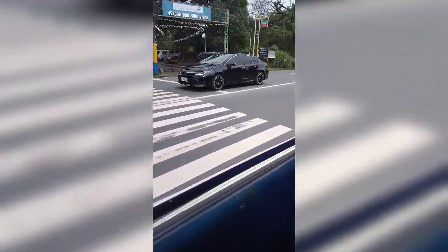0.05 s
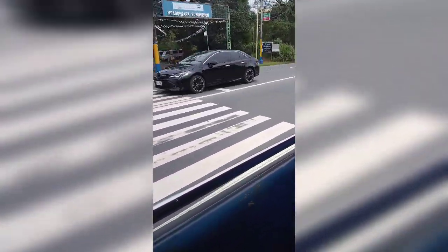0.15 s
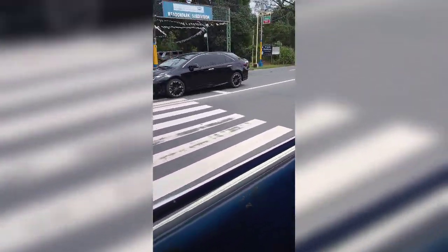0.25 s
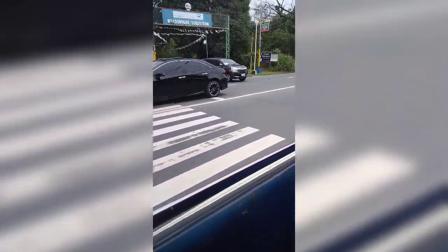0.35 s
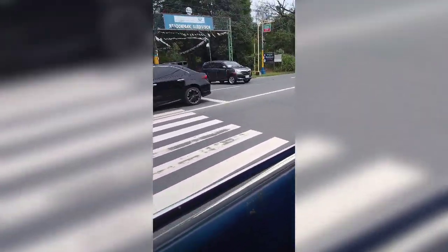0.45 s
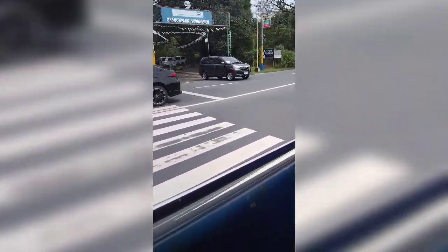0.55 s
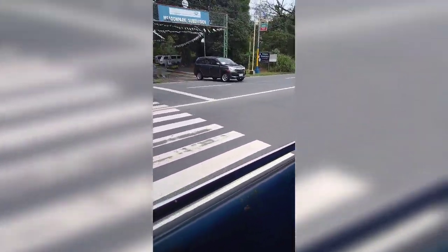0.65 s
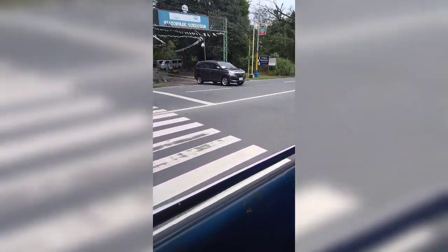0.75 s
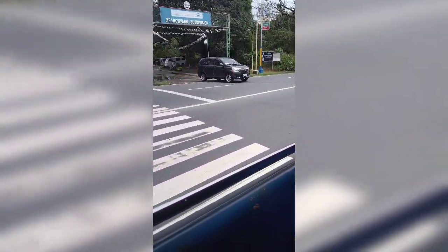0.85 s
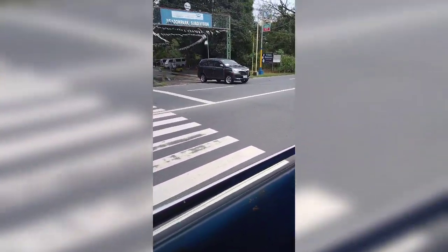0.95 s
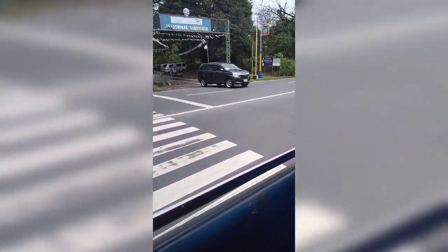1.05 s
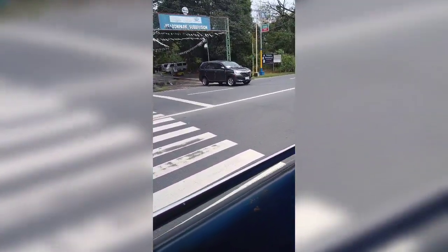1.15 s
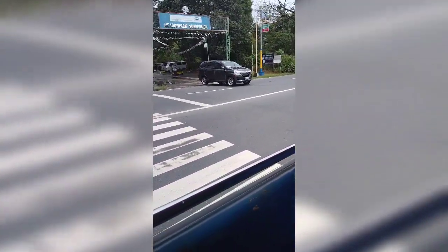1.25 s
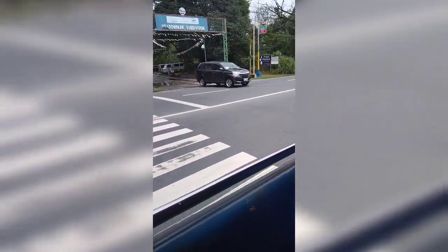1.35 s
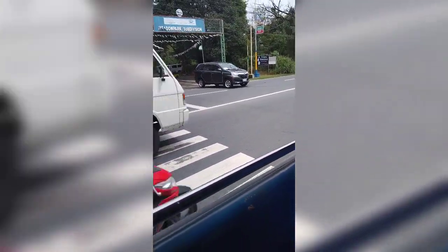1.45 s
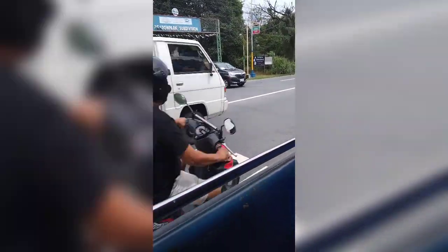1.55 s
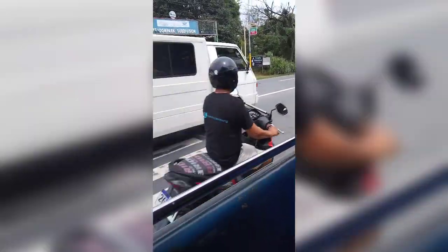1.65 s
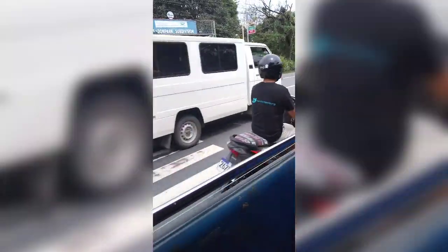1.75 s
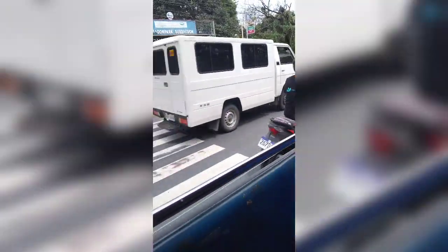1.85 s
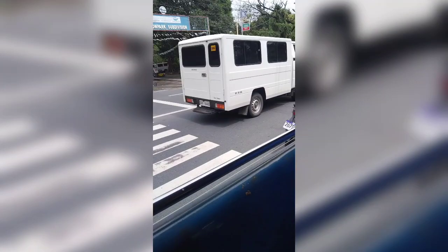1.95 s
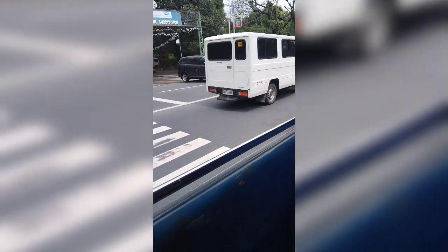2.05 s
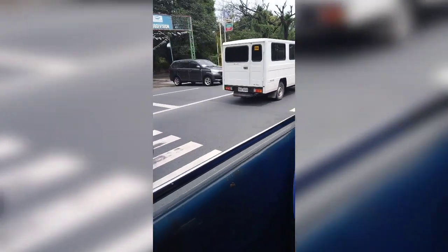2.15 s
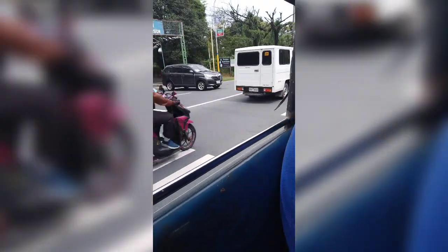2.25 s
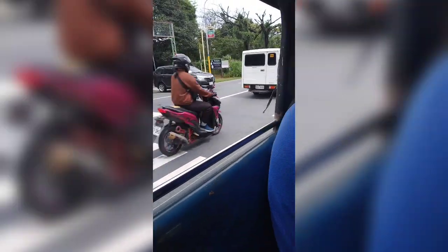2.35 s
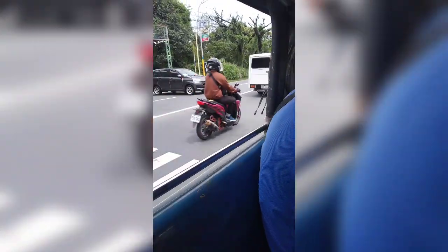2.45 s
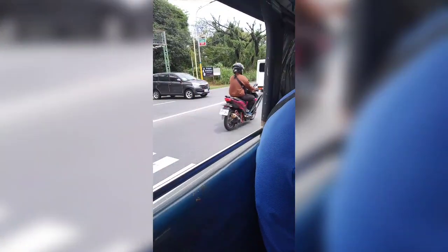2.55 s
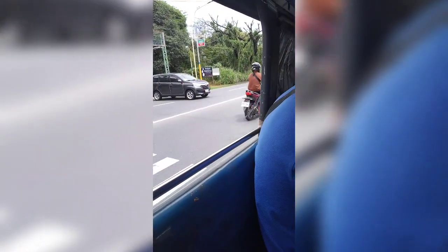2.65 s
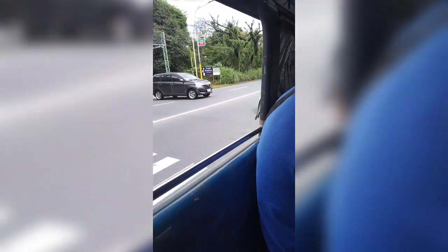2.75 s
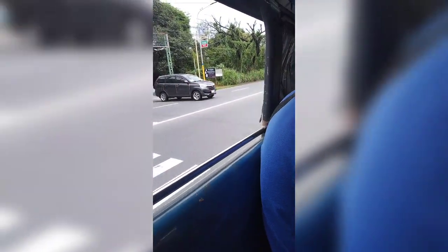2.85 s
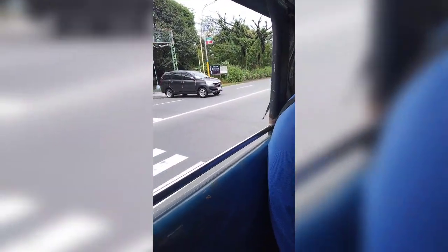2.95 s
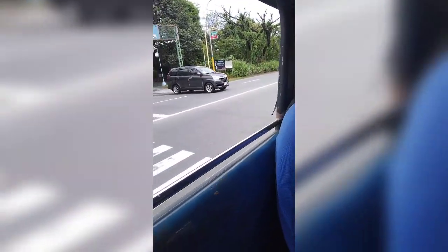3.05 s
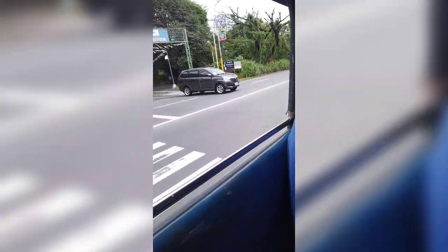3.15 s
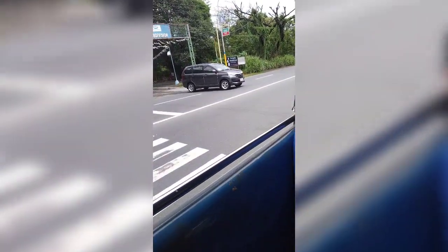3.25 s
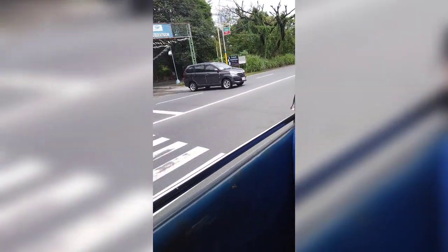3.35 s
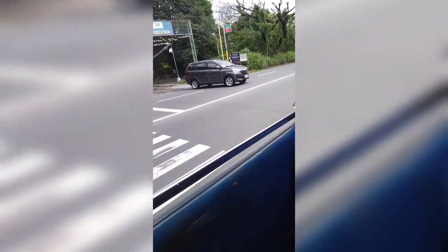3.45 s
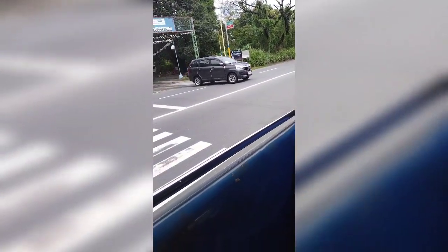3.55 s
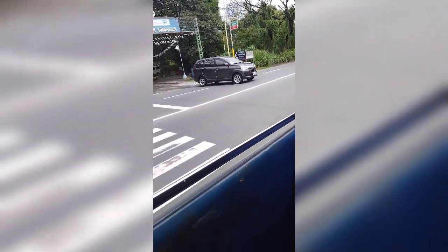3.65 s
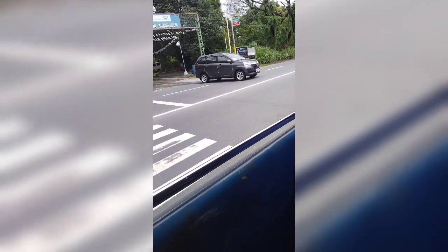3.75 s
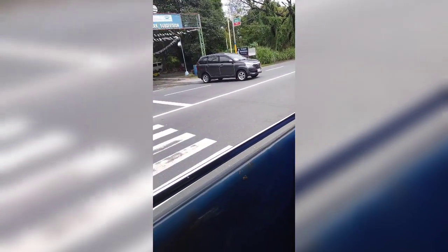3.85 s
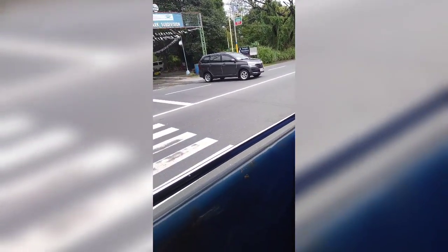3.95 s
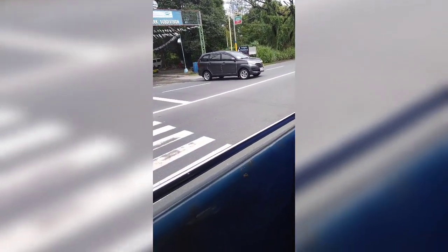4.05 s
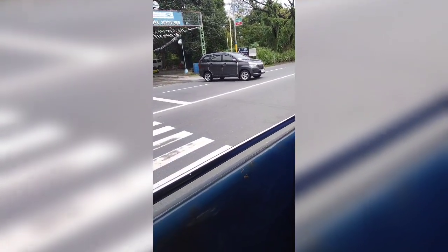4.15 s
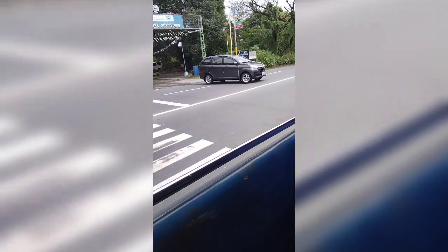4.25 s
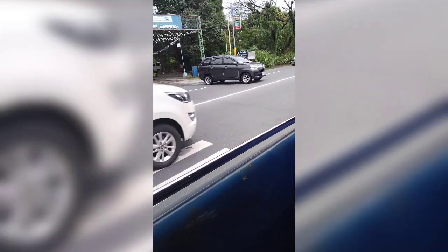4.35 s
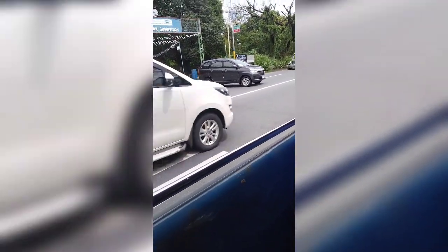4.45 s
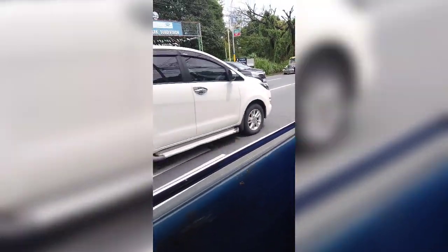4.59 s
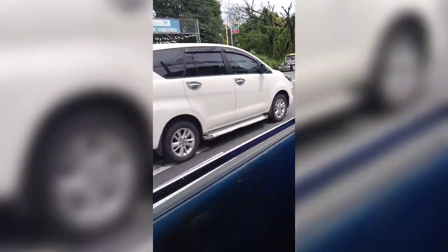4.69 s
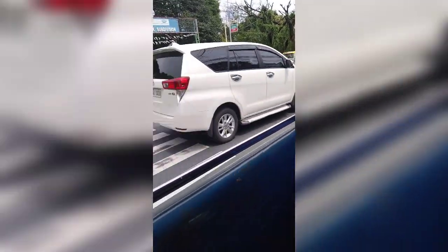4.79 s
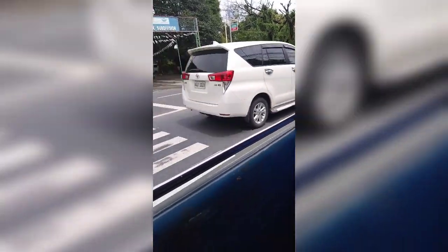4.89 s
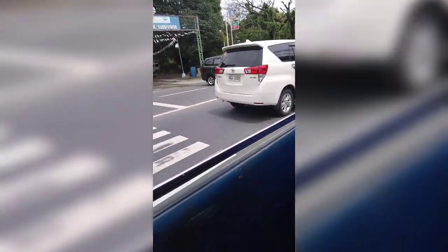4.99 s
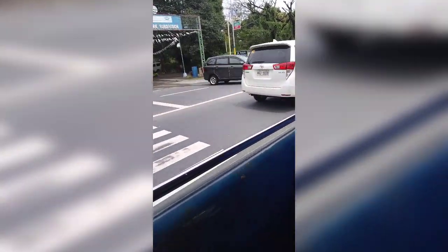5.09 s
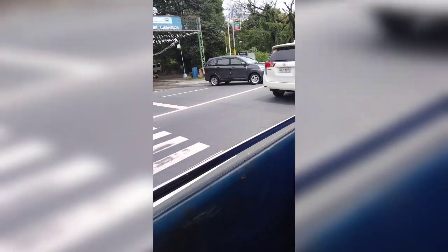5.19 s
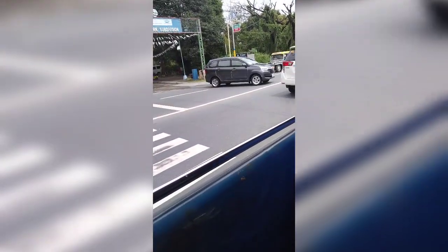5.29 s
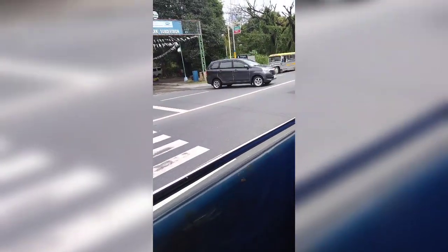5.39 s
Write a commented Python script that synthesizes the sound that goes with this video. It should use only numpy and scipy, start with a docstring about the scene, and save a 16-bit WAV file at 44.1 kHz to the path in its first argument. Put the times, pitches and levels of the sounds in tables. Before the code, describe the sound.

Low cabin rumble runs under street traffic, heard through the open window of a creeping vehicle. After some faint metallic clicks, a van passes close by along with a brief motorcycle boom, then a scooter drones past and fades. Dull blows thud on the vehicle's body, the hardest with a small rattle. Finally a diesel car swishes by and surges briefly as it pulls away.

```python
"""Cabin rumble and distant traffic, heard at the open side window of a creeping vehicle.
A van passes with a motorcycle's short exhaust boom; a droning scooter follows, then a diesel car.
Each pass is tyre roar and engine hiss, pulsed by the firings, coloured by road reflection and cabin.
A loose fitting rattles; dull blows ring the body panels, the hardest just after 4 s."""
import sys
import numpy as np
from scipy import signal
from scipy.fft import rfft, irfft
from scipy.io import wavfile
from scipy.ndimage import uniform_filter1d

SR = 44100
rng = np.random.default_rng(int(sys.argv[2]) if len(sys.argv) > 2 else 0)


def dump(signal):
    """Clip the signal to [-1, 1] and save it as 16-bit WAV at the path in sys.argv[1]."""
    limited = np.clip(np.atleast_2d(signal).T, -1, 1)
    pcm = np.round(limited * 32767).astype(np.int16)
    wavfile.write(sys.argv[1], SR, pcm)


N = 239154
TIME_S = np.arange(N) / SR
STFT = dict(fs=SR, nperseg=1024, noverlap=768)
BINS_HZ, FRAMES_S, _ = signal.stft(np.zeros(N), **STFT)
BINS_HZ = np.maximum(BINS_HZ, 1)[:, None]

# spectra of cabin rumble, faint hiss and loose fitting (frequency [Hz], gain [dB])
RUMBLE_SPECTRUM = [(15, -64), (25, -19), (38, -27), (58, -6.5), (113, -2.5), (140, -5.5), (167, -5.5),
                   (270, -18), (417, -14.5), (503, -21), (549, -18), (800, -24), (1040, -3), (1760, -120)]
AIR_SPECTRUM = [(4000, -12), (7500, -12), (9500, 1.5), (12500, -2), (15500, -0.5)]
RATTLE_SPECTRUM = [(1800, -2), (2500, 2), (3100, -7.5), (3550, 1), (3900, -13), (4500, -5), (5300, -13),
                   (7600, -11), (9700, -20), (15500, -27)]
# runs of chatter (start [s], level [dB], length [s], low cut [Hz])
RATTLE_RUNS = [(0.515, -46.5, 0.043, 3460), (0.716, -37, 0.011, 2600), (0.751, -36.5, 0.026, 2780),
               (4.056, -38, 0.019, 3270), (4.79, -42, 0.036, 1520)]
# body panel modes (frequency [Hz], gain [dB], free T60 [s])
BODY_MODES = [(127.3, -3, 0.15), (161, -6.5, 0.11), (180.4, -14.5, 0.35), (231.7, -19.5, 0.5),
              (301, -18, 0.46), (353, 3, 0.038), (383, -16.5, 0.36), (424, -22.5, 0.51), (533, -33, 0.6),
              (562, -5.5, 0.11), (608, -20, 0.29), (1302, 1.5, 0.16)]
# blows on the body (time [s], gain [dB], low cut [Hz], high cut [Hz], ring [0-1])
BLOWS = [(3.445, 1, 74.5, 131, 0.1), (3.943, 3, 82, 146, 0.4), (4.052, 10, 274, 400, 0.63),
         (4.062, 3.5, 274, 860, 0.45), (4.070, 12.5, 102, 507, 1)]
# hollow tones in the street noise (time [s], frequency [Hz], level [dB], length [s])
STREET_TONES = [(1.432, 690, -44, 0.027), (1.522, 421, -38.5, 0.039), (1.702, 372, -40.5, 0.031),
                (3.103, 1352, -43, 0.013), (3.171, 610, -48, 0.041), (5.233, 1590, -32, 0.0047)]
# exhaust resonances (frequency [Hz], width [Hz], gain [dB])
SCOOTER_PIPE_MODES = [(223, 48, -7), (313, 37, -6.5), (397.5, 66, -6.5)]
CAR_PIPE_MODES = [(190, 51, 0), (340, 65, 6)]
# scooter exhaust envelope (time [s], gain [dB])
SCOOTER_ENVELOPE = [(2.04, -42.5), (2.074, -61), (2.164, -31.5), (2.234, -33.5), (2.344, -26.5),
                    (2.454, -36), (2.504, -33), (2.65, -33.5), (2.9, -62.5)]
# motorcycle exhaust note (time [s], frequency [Hz])
BOOM_NOTE = [(1.55, 132.3), (1.61, 125.9), (1.66, 119), (1.71, 114.2), (1.79, 128.8), (1.92, 113)]
# engine hiss spectra (frequency [Hz], gain [dB])
FAR_SPECTRUM = [(2200, 0), (2450, 16), (2620, -59), (3400, -8), (5500, -69), (7000, -17), (8000, -4),
                (9500, -63), (15500, -51)]
VAN_SPECTRUM = [(2000, -0.5), (2700, -10.5), (3340, -6), (4360, -15.5), (5540, -11.5), (7680, -15.5),
                (9000, -22), (15500, -24.5)]
SCOOTER_SPECTRUM = [(2000, 5), (2440, 4), (2850, -4.5), (3320, -1.5), (4000, -8.5), (6250, -11),
                    (7600, -11.5), (9000, -17), (12000, -24.5), (15500, -20)]
CAR_SPECTRUM = [(2000, -14), (2250, 6.5), (2900, 5), (3290, -2), (3580, 2.5), (4000, -12), (4450, -6.5),
                (5850, -2.5), (6500, -13), (8700, -19), (15500, -21.5)]
# cabin modes in the roar (frequency [Hz], base width [Hz], far [dB], van [dB], scooter [dB], car [dB])
ROAR_MODES = [(567, 33, 3, 28, 6.5, -12), (942, 69, 6.5, 6.5, 1, 4.5), (1328, 75, 10.5, -4.5, 1, -2.5),
              (1572, 120, -51, -0.5, -10, -0.5), (1702.5, 61, -1, 2, -4.5, -10.5),
              (1955, 25, -8, 1.5, 0, -7)]
# peaks and dips in quiet hiss (frequency [Hz], width [Hz], base gain [dB])
HISS_PEAKS = [(2278, 12, -2), (2998, 133, 7), (3740, 36, 30), (4310, 490, 16), (6940, 32, -13),
              (8020, 3600, 8.5), (13900, 480, 9)]
# passes; the car surges again as it pulls away
# (vehicle, abreast [s], hold [s], hiss [dB], base rise [dB/s], base fall [dB/s],
#  roar [dB], rise [dB/s], fall [dB/s], roar low cut when near [Hz])
PASS_BYS = [("far", 0.32, 0.48, -61, 140, 10.4, -55.5, 10, 2.2, 1570),
            ("van", 1.447, 0.21, -40, 17.2, 83, -36, 42.5, 70, 1050),
            ("scooter", 2.32, 0.33, -35, 15.2, 19.6, -31.5, 90, 34, 630),
            ("far", 3.234, 0.6, -60.5, 25, 25, -53, 28, 100, 310),
            ("car", 4.684, 0.34, -42, 20, 14, -41.5, 34, 6.8, 760),
            ("car", 5.325, 0.15, -45.5, 170, 60, -37.5, 880, 87, 1400)]


def undb(db):
    """Decibels to gain."""
    return 10 ** (np.asarray(db) / 20)


def unit(x):
    """Scale to RMS 1."""
    return x / np.sqrt(np.mean(x ** 2))


def curve(points):
    """Linear interpolation of (time, value) points at every sample."""
    return np.interp(TIME_S, *np.transpose(points))


def gate(start_s, end_s, fade_s=0.025):
    """Gain 1 between two times, soft edges."""
    return np.sqrt(np.clip(np.minimum(TIME_S - start_s, end_s - TIME_S) / fade_s + .5, 0, 1))


def swell(at_s, start_s, end_s, rise_db_per_s, fall_db_per_s, steepen_per_s=0):
    """Gain that rises until start_s, holds, and falls after end_s."""
    early_s, late_s = np.maximum(start_s - at_s, 0), np.maximum(at_s - end_s, 0)
    drop_db = rise_db_per_s * early_s + fall_db_per_s * late_s
    return undb(-drop_db * (1 + steepen_per_s * (early_s + late_s)))


def colour(spectrum, hz):
    """Gain of a spectrum, interpolated on log frequency."""
    points_hz, db = np.transpose(spectrum)
    return undb(np.interp(np.log(np.maximum(hz, 1)), np.log(points_hz), db))


def bell(x, centre, width):
    """Resonance curve, peak 1."""
    return 1 / (1 + ((x - centre) / (.5 * width)) ** 2)


def filtered(x, gain):
    """Filter by a function of frequency."""
    return irfft(rfft(x) * gain(np.fft.rfftfreq(N, 1 / SR)), N)


def butter(x, hz, kind, order=2):
    """Low-pass or high-pass."""
    return signal.sosfilt(signal.butter(order, hz, kind, fs=SR, output="sos"), x)


def noise():
    """White noise."""
    return rng.standard_normal(N)


def drift(bandwidth_hz):
    """Smooth random drift, RMS 1."""
    return unit(filtered(noise(), lambda f: np.exp(-(f / bandwidth_hz) ** 2)))


def shaped_noise(gain, low_hz, high_hz):
    """Noise with a time-varying spectrum; power held at 1 between low_hz and high_hz."""
    band = (BINS_HZ > low_hz) & (BINS_HZ < high_hz)
    gain = gain / np.sqrt(np.mean(gain ** 2 * band, axis=0))
    spectra = signal.stft(noise(), **STFT)[2]
    return signal.istft(spectra * gain, **STFT)[1][:N]


def patches(frames):
    """Random field of narrow bands that come and go, RMS 1."""
    field = uniform_filter1d(rng.standard_normal((len(BINS_HZ), len(FRAMES_S))), size=3, axis=0)
    return unit(uniform_filter1d(uniform_filter1d(field, frames, axis=1), frames, axis=1))


def cabin(rumble_db=-51.5, air_db=-66.5):
    """Low rumble of the creeping vehicle, plus faint flickering hiss."""
    rumble = unit(filtered(noise(), lambda f: colour(RUMBLE_SPECTRUM, f) / (1 + (f / 750) ** 8)))
    flicker = undb(3 * patches(frames=16))
    rumble *= undb(rumble_db + 0.25 * drift(2.7))
    air = shaped_noise(colour(AIR_SPECTRUM, BINS_HZ) * flicker, 7000, 16000)
    return rumble + air * undb(air_db)


def rattles(chatter_t60_s=0.13, tail_db=-12, tail_t60_s=1.0):
    """A loose metal fitting chatters: bright noise bursts that build and die away."""
    out = np.zeros(N)
    for start_s, db, length_s, low_hz in RATTLE_RUNS:
        age_s = np.maximum(TIME_S - start_s, 0)
        rise = np.minimum(age_s / (.35 * length_s), 1)
        decay = undb(-60 * np.maximum(age_s - length_s, 0) / chatter_t60_s)
        tail = undb(tail_db - 60 * age_s / tail_t60_s)
        chatter = filtered(noise() * undb(0.31 * drift(370)), lambda f: colour(RATTLE_SPECTRUM, f))
        out += unit(butter(chatter, low_hz, "high", order=8)) * rise * np.maximum(decay, tail) * undb(db)
    return out


def knocks(gain_db=-24, tail_db=-13, tail_t60_s=.45, contact_s=0.0028, damped_t60_s=0.081):
    """Blows ring the body panels; soft ones reach only the lowest modes and die at once."""
    age_s = TIME_S[:SR // 2]
    panels = sum(undb(db - 60 * age_s / t60_s) * np.sin(2 * np.pi * hz * age_s)
                 for hz, db, t60_s in BODY_MODES)
    tail = unit(butter(butter(noise(), 567, "low", order=8), 87, "high"))[:len(age_s)]
    tail *= undb(tail_db - 60 * age_s / tail_t60_s)
    push = 1 - np.exp(-age_s / contact_s)  # padded contact
    out = np.zeros(N)
    for start_s, db, low_hz, high_hz, ring in BLOWS:
        damping = undb(-60 * age_s * max(1 - ring, 0) / damped_t60_s)
        blow = butter((panels + tail) * push * damping, high_hz, "low", order=4)
        blow = butter(blow, low_hz, "high", order=3)
        out += np.pad(blow * undb(db + gain_db), (int(start_s * SR), N))[:N]
    return out


def street_tones():
    """Brief hollow tones swell out of the street noise."""
    sway_rad = 0.64 * drift(80)
    out = np.zeros(N)
    for peak_s, hz, db, length_s in STREET_TONES:
        envelope = undb(db) * np.exp(-2 * ((TIME_S - peak_s) / length_s) ** 2)
        out += np.sqrt(2) * envelope * np.sin(2 * np.pi * hz * TIME_S + sway_rad)
    return out


def scooter_whine(level_db=-55, abreast_s=2.22, cross_s=0.32, speed_m_per_s=12):
    """Two thin drive tones sink by Doppler shift as the scooter passes."""
    along = (TIME_S - abreast_s) / cross_s  # in units of the closest distance
    distance = np.hypot(1, along)
    doppler = 1 - speed_m_per_s / 343 * along / distance
    tones = sum(np.sin(2 * np.pi * np.cumsum(hz * doppler) / SR) * drift(70) * undb(1.4 * drift(12))
                for hz in (10480, 14400))
    return tones * undb(level_db) / distance ** 2


def pipe_drone(modes, firing_hz, jitter, gas_db, harmonic, note_db):
    """Uneven firings and rushing gas ring an exhaust pipe; one harmonic stands out."""
    cycles = np.cumsum(firing_hz * (1 + jitter * drift(41.7))) / SR
    firings = unit(np.diff(np.floor(cycles), prepend=0) * undb(3.6 * drift(72)))
    flow = firings + undb(gas_db) * noise()
    rasp = unit(filtered(flow, lambda f: sum(undb(db) * bell(f, hz, width) for hz, width, db in modes)))
    note = unit(np.sin(2 * np.pi * harmonic * cycles) * undb(2.2 * drift(25)))
    return unit(rasp + undb(note_db) * note)


def exhausts(scooter_gain_db=0.5, car_gain_db=-38):
    """The scooter's pipe drones beside the window; the car's sounds briefly as it pulls away."""
    scooter = pipe_drone(SCOOTER_PIPE_MODES, firing_hz=44.6, jitter=.018,
                         gas_db=3, harmonic=6, note_db=-0.5)
    car = pipe_drone(CAR_PIPE_MODES, firing_hz=67.9, jitter=0.025, gas_db=6, harmonic=5, note_db=-4.0)
    scooter *= undb(curve(SCOOTER_ENVELOPE) + scooter_gain_db)
    scooter *= gate(SCOOTER_ENVELOPE[0][0], SCOOTER_ENVELOPE[-1][0])
    return scooter + car * swell(TIME_S, 5.392, 5.385, 131, 350) * undb(car_gain_db)


def motorcycle_boom(start_s=1.575, end_s=1.662, note_db=-17, octave_db=-31, beat_hz=9.9, beat_db=2.5):
    """The tailpipe faces the window and the cabin booms; the note beats and breaks up as it turns away."""
    phase = 2 * np.pi * np.cumsum(curve(BOOM_NOTE)) / SR
    turned = np.clip((TIME_S - end_s) / 0.07, 0, 1)
    beat = undb(beat_db * turned * np.cos(2 * np.pi * beat_hz * (TIME_S - 1.69)))
    envelope = undb(note_db) * swell(TIME_S, start_s, end_s, 865, 75, steepen_per_s=1.1)
    note = np.sqrt(2) * np.sin(phase + .7 * turned * drift(25))
    note *= undb((.5 + 2.2 * turned) * drift(30))
    octave = np.sqrt(2) * np.sin(2 * phase + 0.84 * drift(38))
    octave *= undb(octave_db) * swell(TIME_S, start_s, end_s, 500, 180)
    gas = unit(filtered(noise(), lambda f: bell(f, 182, 106) * f / (f + 60))) * undb(-19 + 6.2 * turned)
    buffet = unit(butter(noise(), 80, "low", order=4)) * undb(-27)  # gas pushes the cabin air
    return ((note + gas + buffet) * envelope + octave) * beat


def passing(name, far_cut_hz):
    """Per frame: hiss level, roar level, roar low cut, time since abreast."""
    hiss, roar, cut_hz, since_s = 1e-12, 1e-12, far_cut_hz, np.inf
    for (who, abreast_s, hold_s, hiss_db, hiss_rise, hiss_fall,
         roar_db, roar_rise, roar_fall, near_cut_hz) in PASS_BYS:
        if who == name:
            span_s = abreast_s - hold_s / 2, abreast_s + hold_s / 2
            # the window frame shades the hiss: it fades ever faster with distance
            shaded = swell(FRAMES_S, *span_s, hiss_rise, hiss_fall, steepen_per_s=0.65)
            hiss = np.hypot(hiss, undb(hiss_db) * shaded)
            roar = np.hypot(roar, undb(roar_db) * swell(FRAMES_S, *span_s, roar_rise, roar_fall))
            # the cut moves towards each pass's near value as it comes abreast
            facing = bell(FRAMES_S, abreast_s + 0.25 * hold_s, 0.88 * hold_s)
            cut_hz = cut_hz * (near_cut_hz / far_cut_hz) ** facing
            offset_s = FRAMES_S - abreast_s
            since_s = np.where(abs(offset_s) < abs(since_s), offset_s, since_s)
    return 20 * np.log10(hiss), 20 * np.log10(roar), cut_hz, since_s


def road_reflection(since_s, cross_s, near_crest_hz, crest_db, approach_db, lead_s):
    """Road bounce: a crest and a trough sink as the vehicle nears; one band cancels briefly."""
    distance = np.hypot(1, since_s / cross_s)  # 1 at the closest point
    crest_hz = near_crest_hz * np.minimum(distance, 2.5)
    ripple = bell(BINS_HZ, crest_hz, crest_hz / 10.5) - bell(BINS_HZ, 0.69 * crest_hz, 0.25 * crest_hz)
    depth_db = crest_db + approach_db * bell(since_s, -lead_s, 0.45)
    notch_db = -20 * bell(since_s, -0.57, 0.14) * bell(BINS_HZ, 4190, 810)
    return undb(depth_db * ripple + notch_db), crest_hz


def vehicle(name, spectrum, roar_column, firing_hz, clatter_db, peak_share, far_cut_hz, **reflection):
    """Tyre roar and engine hiss: broad when loud; when quiet, peaks stand out and narrow bands flicker."""
    hiss_db, roar_db, cut_hz, since_s = passing(name, far_cut_hz)
    quiet = np.clip((-29.5 - hiss_db) / 20, 0, 1.2)
    road, crest_hz = road_reflection(since_s, **reflection)

    widen = 1 + 1.8 * np.clip((roar_db + 46) / 10, 0, 1.3)  # direct sound fills the valleys
    roar_gain = np.sqrt(sum((undb(levels_db[roar_column]) * bell(BINS_HZ, hz, width_hz * widen)) ** 2
                            for hz, width_hz, *levels_db in ROAR_MODES))
    roar_gain /= np.sqrt(1 + (cut_hz / BINS_HZ) ** 14)
    roar_gain *= undb((1 + 5.8 * quiet) * patches(frames=7))

    hiss_cut_hz = np.maximum(2130, 0.79 * crest_hz)
    hiss_gain = colour(spectrum, BINS_HZ) / np.sqrt(1 + (hiss_cut_hz / np.maximum(BINS_HZ, 100)) ** 36)
    peaks_db = peak_share * sum(db * bell(BINS_HZ, hz, width_hz) for hz, width_hz, db in HISS_PEAKS)
    flicker_db = 4.5 * (patches(frames=30) + patches(frames=6)) / (1 + (BINS_HZ / 11000) ** 6)
    hiss_gain *= undb(quiet * (peaks_db + flicker_db))

    # one burst of mechanical noise per firing
    cycles = np.cumsum(firing_hz * (1 + 0.036 * drift(17.7))) / SR
    throb = unit(undb(clatter_db * (np.cos(2 * np.pi * cycles) + .5 * drift(60))))
    hiss_db, roar_db, quiet = (np.interp(TIME_S, FRAMES_S, x) for x in (hiss_db, roar_db, quiet))
    waver = quiet * drift(9.9)
    hiss = shaped_noise(hiss_gain * road, 2195, 14000) * undb(hiss_db + 2.4 * waver)
    roar = shaped_noise(roar_gain * road, 850, 3100) * undb(roar_db + 0.47 * waver)
    return throb * (hiss + roar)


def traffic():
    """Van, scooter and diesel car pass close by; distant traffic fills the gaps."""
    far = vehicle("far", FAR_SPECTRUM, roar_column=0, firing_hz=35.98, clatter_db=3.0,
                  peak_share=0.13, far_cut_hz=730,
                  near_crest_hz=1270, crest_db=4.7, approach_db=-1.5, lead_s=0, cross_s=2.0)
    van = vehicle("van", VAN_SPECTRUM, roar_column=1, firing_hz=72.6, clatter_db=0.32,
                  peak_share=0.43, far_cut_hz=1590,
                  near_crest_hz=1415, crest_db=-4, approach_db=11, lead_s=0.26, cross_s=0.35)
    scooter = vehicle("scooter", SCOOTER_SPECTRUM, roar_column=2, firing_hz=93.6, clatter_db=0.52,
                      peak_share=0.25, far_cut_hz=1020,
                      near_crest_hz=1123, crest_db=2.0, approach_db=6, lead_s=0.57, cross_s=0.22)
    car = vehicle("car", CAR_SPECTRUM, roar_column=3, firing_hz=33, clatter_db=1.9,
                  peak_share=0.73, far_cut_hz=1550,
                  near_crest_hz=1544, crest_db=5.5, approach_db=0.5, lead_s=0.31, cross_s=0.54)
    return far + van + scooter + car


def scene():
    """Mono sum inside the cabin."""
    street = traffic() + motorcycle_boom() + exhausts() + scooter_whine() + street_tones()
    return (street + knocks() + rattles() + cabin())[None]


def record(dry):
    """Steep low-pass at 15.6 kHz."""
    return signal.sosfilt(signal.ellip(10, .2, 80, 15600, fs=SR, output="sos"), dry)


dry = scene()
out = record(dry)
dump(out)
```